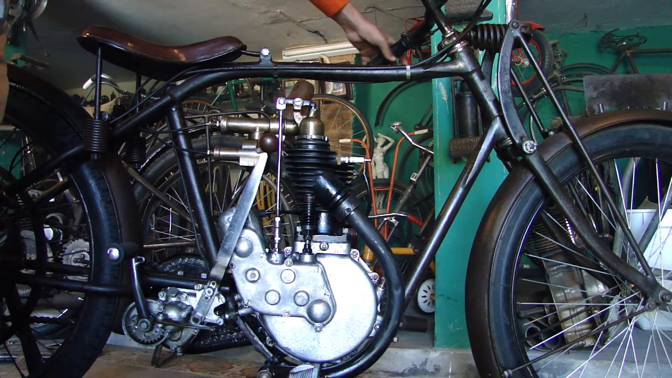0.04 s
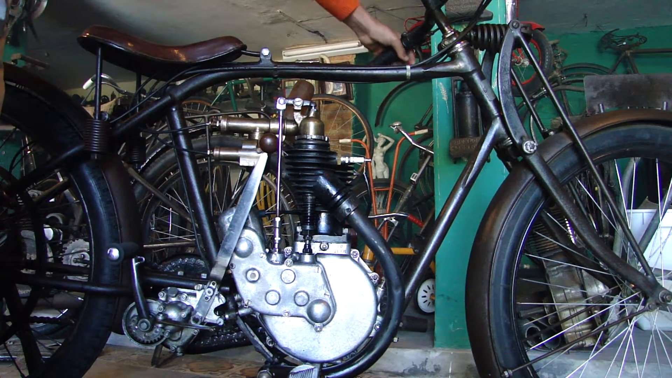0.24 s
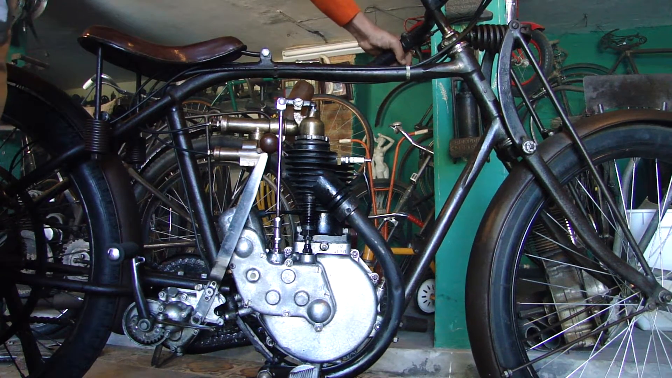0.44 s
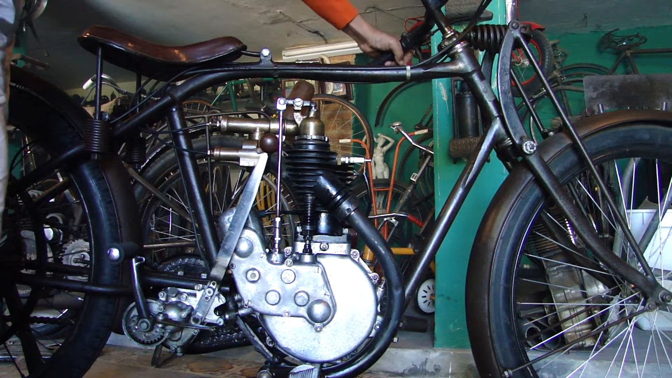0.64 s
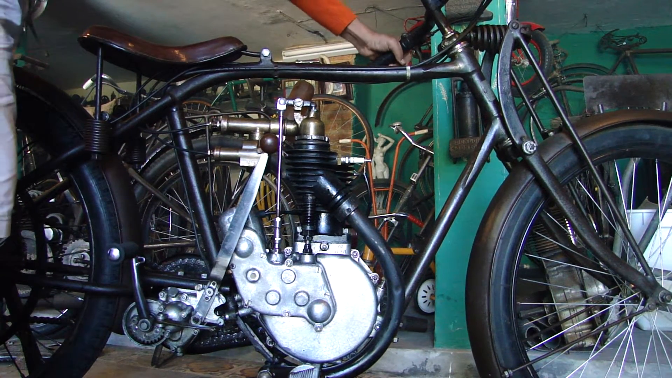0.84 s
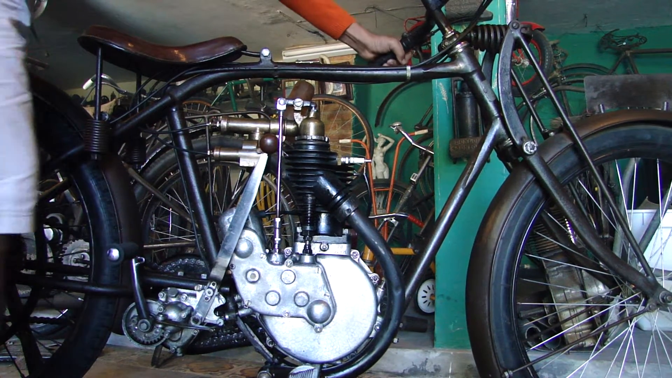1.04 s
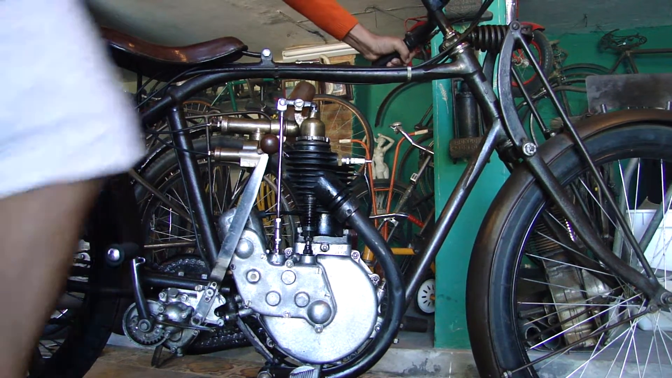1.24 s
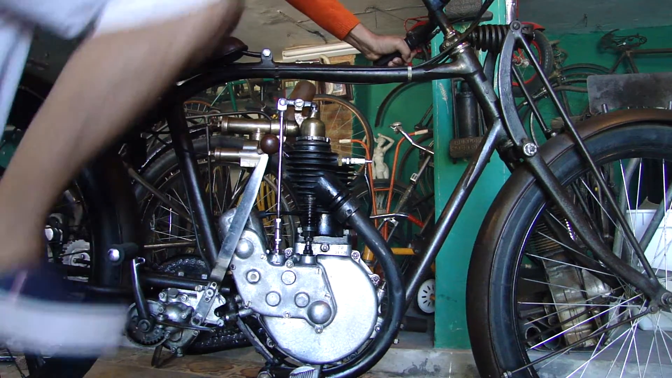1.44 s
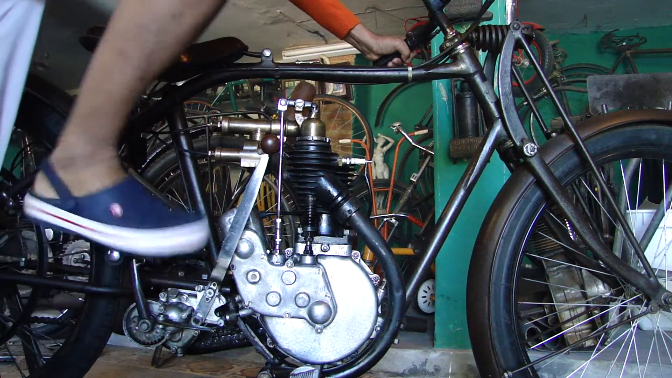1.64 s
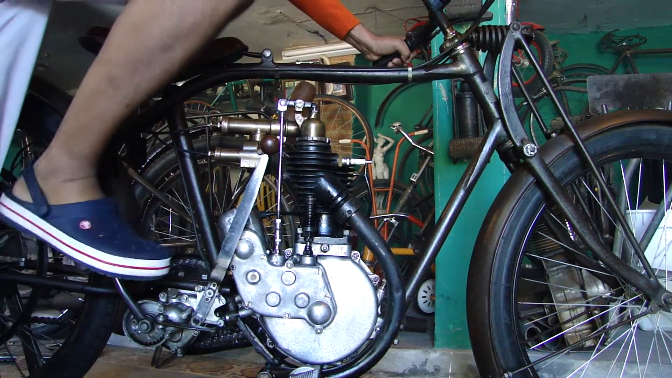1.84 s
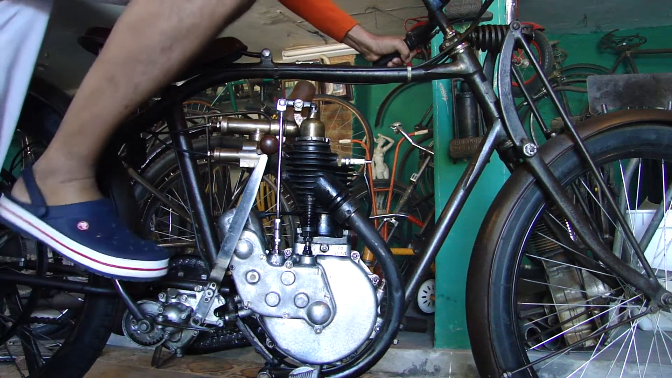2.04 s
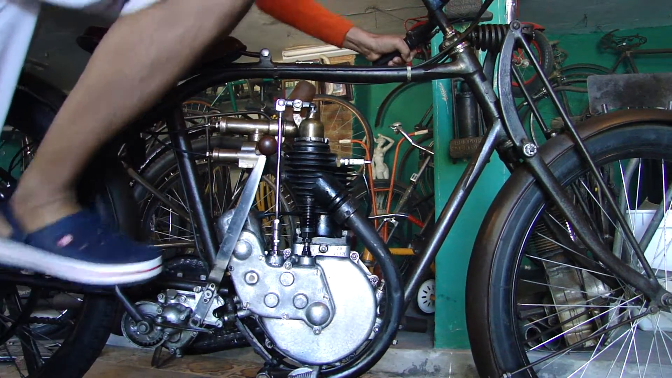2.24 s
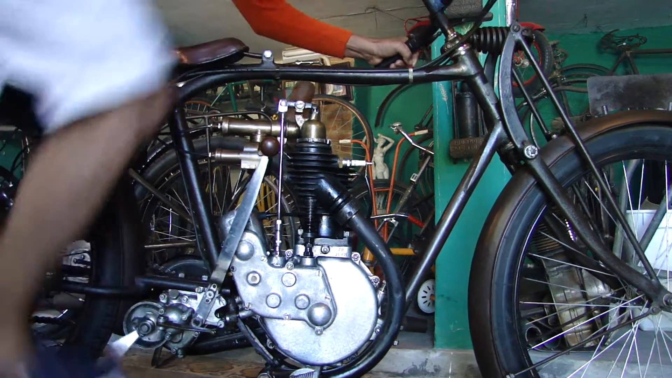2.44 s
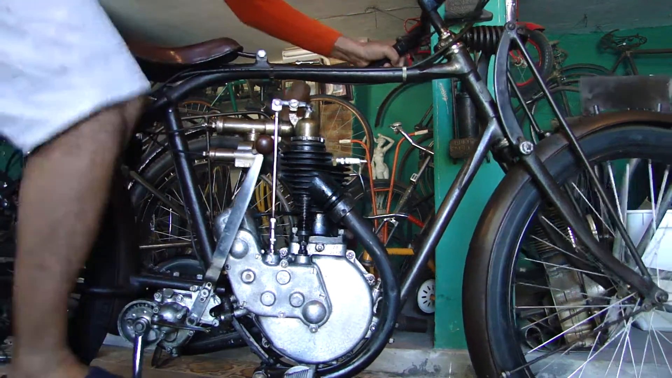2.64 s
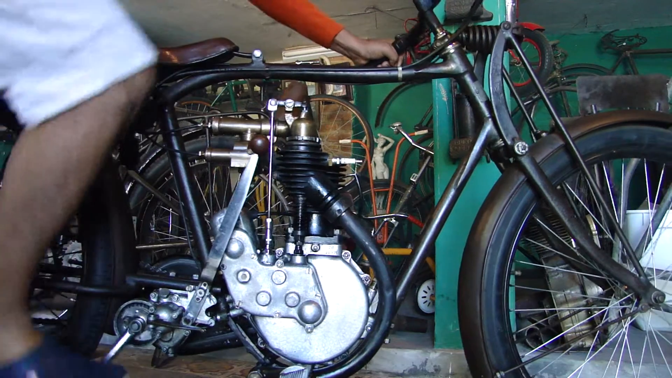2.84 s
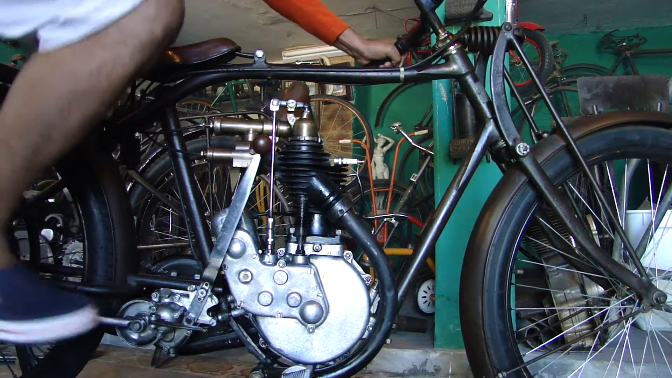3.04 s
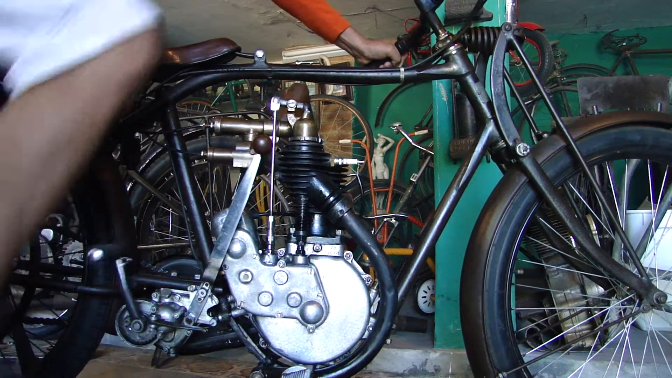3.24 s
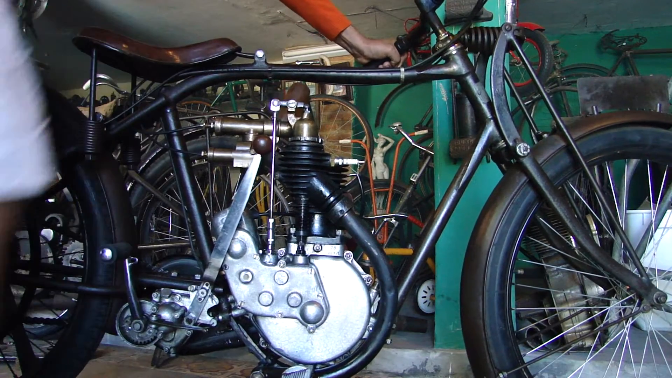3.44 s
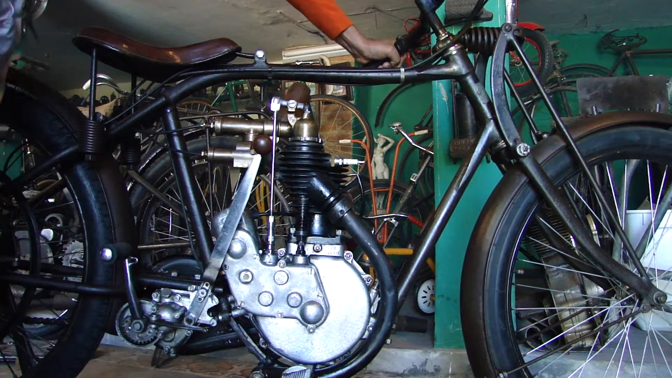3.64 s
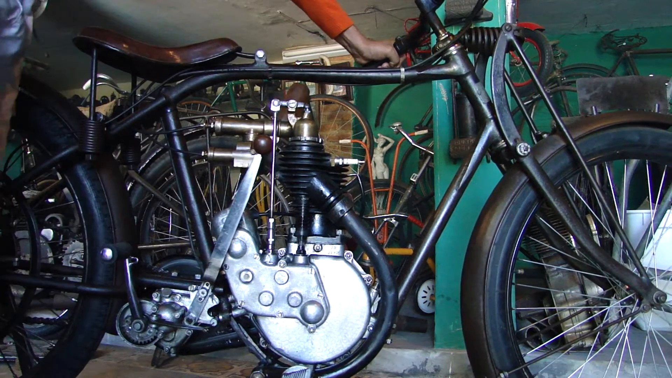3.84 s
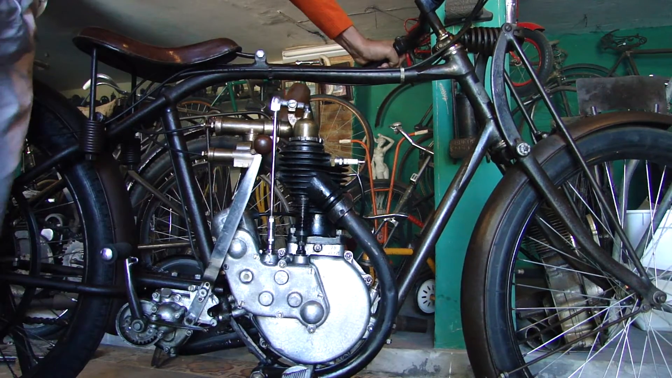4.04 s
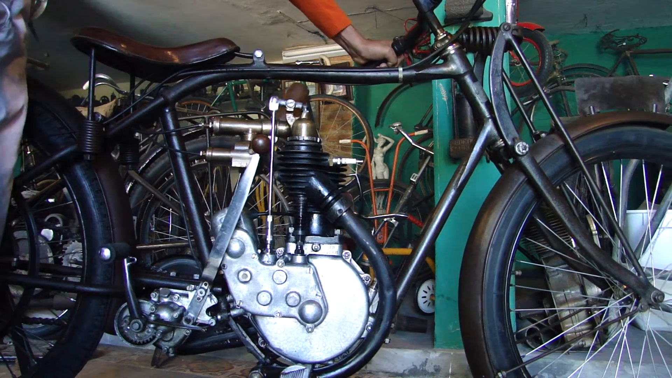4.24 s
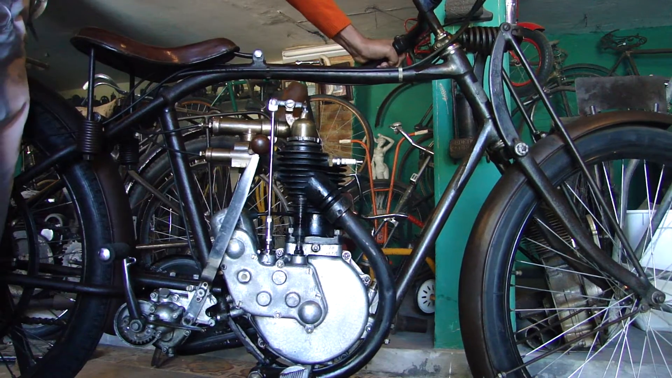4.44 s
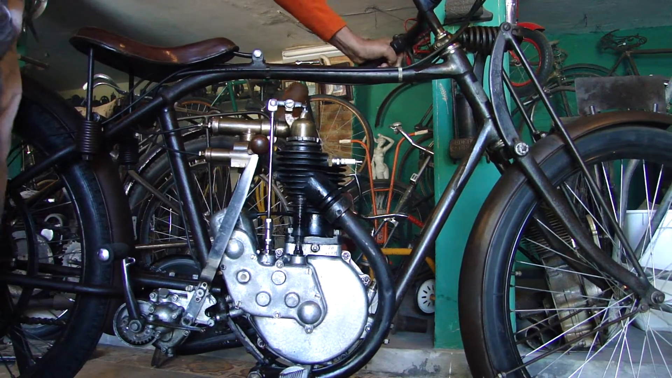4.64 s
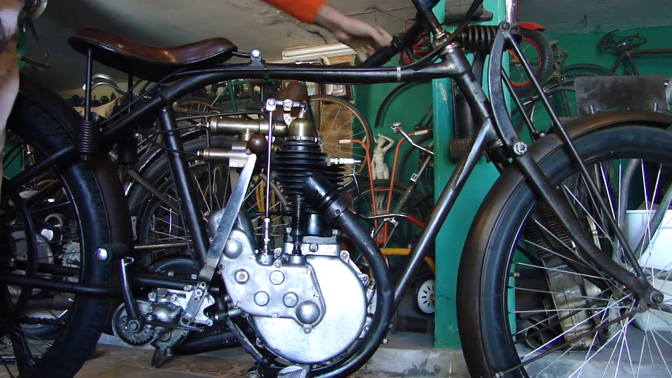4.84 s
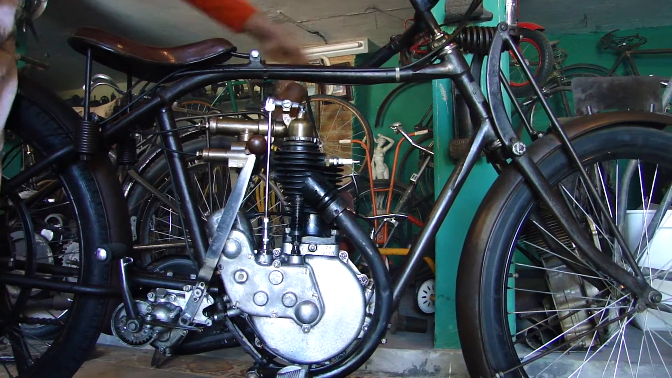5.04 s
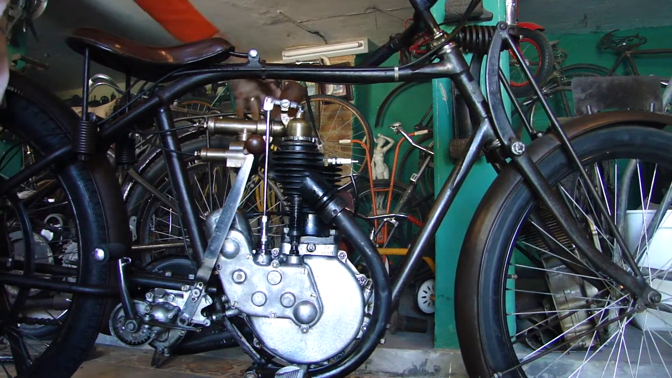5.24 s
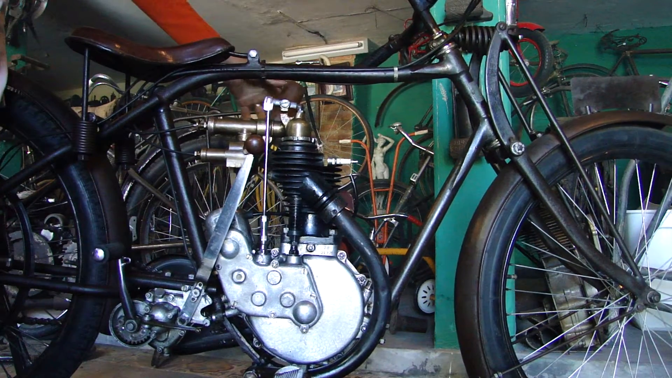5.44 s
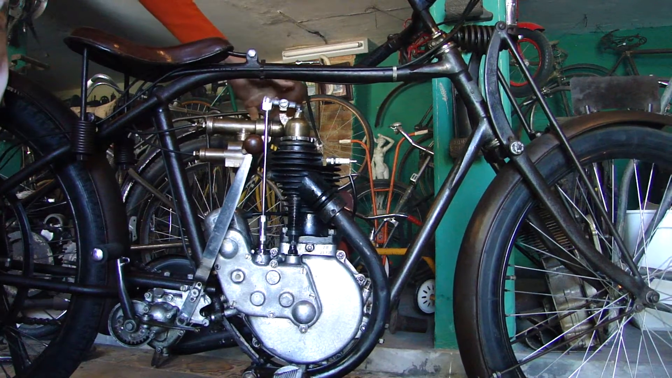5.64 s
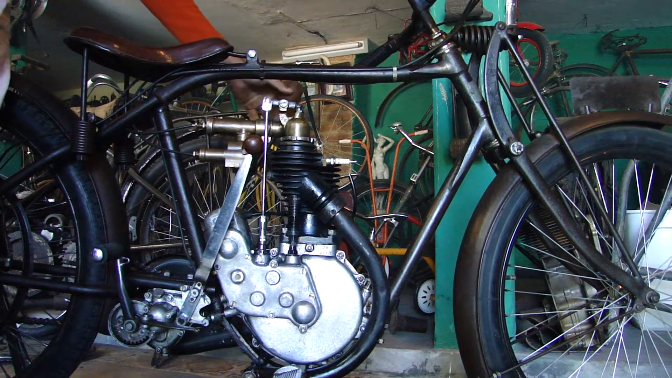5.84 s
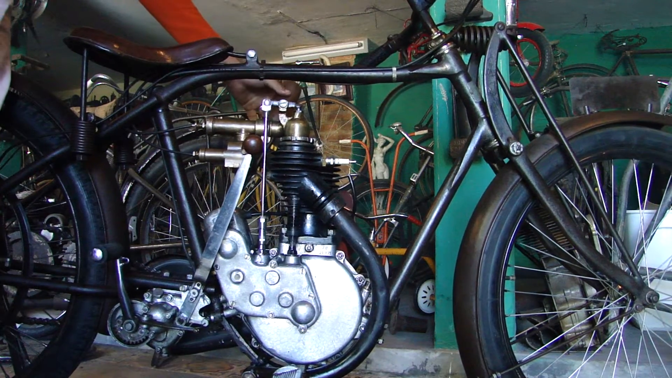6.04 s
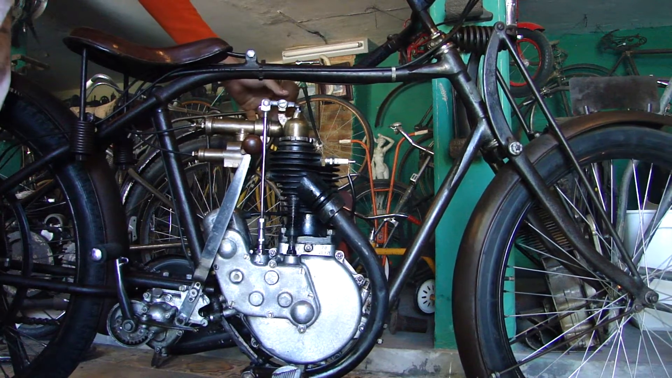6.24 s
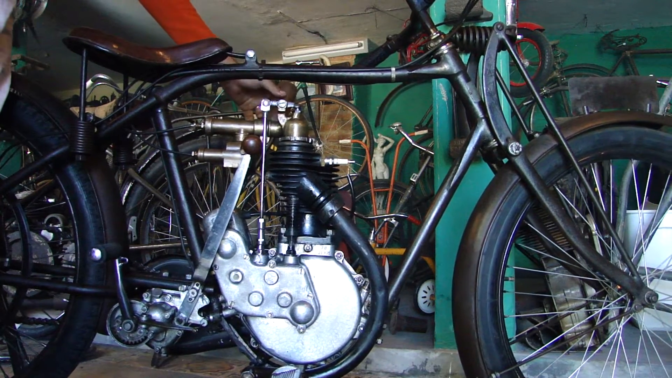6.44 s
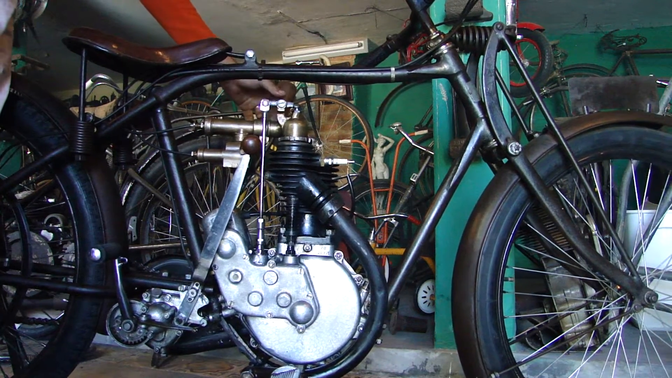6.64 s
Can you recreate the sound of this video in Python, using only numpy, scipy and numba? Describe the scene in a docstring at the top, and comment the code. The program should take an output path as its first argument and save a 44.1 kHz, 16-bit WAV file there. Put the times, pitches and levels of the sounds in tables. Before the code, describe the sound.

Quiet metallic clicks and a foot on a pedal, then a rapid ratchet run and a harsh engine start settling into clattering, skipping exhaust pops.

```python
"""In a small workshop with a faint drone and swishing clothes, a lever clicks; its struck metal rings on.
A foot lands on the kick-start pedal, gears squeak, and the ratchet clicks singly, then in a quick run.
The old single-cylinder motorcycle catches harshly and settles to an idle, often skipping cycles.
Random ticks shaken by the turning engine make the clatter; each firing is a pressure pulse, a crack and a hiss.
The bangs ring the room, and the whole level dips briefly after each one."""
import sys
import numpy as np
from scipy import signal
from scipy.fft import rfft, irfft, next_fast_len
from scipy.io import wavfile
from scipy.ndimage import uniform_filter1d
from numba import njit

SR = 44100
rng = np.random.default_rng(int(sys.argv[2]) if len(sys.argv) > 2 else 0)


def materialize(psi):
    """Save the field psi as 16-bit PCM at rate SR to the path in sys.argv[1].

    A 1-D psi becomes a single channel; in a 2-D psi each row is a channel.
    """
    bounded = np.clip(np.atleast_2d(psi).T, -1, 1)
    quanta = np.round(bounded * 32767).astype(np.int16)
    wavfile.write(sys.argv[1], SR, quanta)


N = 295470
TIME = np.arange(N) / SR
TAIL = TIME[:SR * 3 // 4]  # time axis of short sounds and echoes, in seconds
TOP_HZ = 13000

# All levels are relative: the functions, the room and the final level control shift them further.
# swells of a faint, wavering drone: [middle t/s, half length/s, level/dB]
DRONE_SWELLS = [(.02, 0.1, -58), (.82, 0.44, -53.5), (1.44, 0.077, -52.5)]
# tone of the quiet air: [f/Hz, level/dB]
AIR_SPECTRUM = [(20, -50), (69, -30), (200, -20), (390, -17), (900, -20), (10300, -33), (13000, -46)]

# ringing modes of the workshop: [f/Hz, level/dB, t60/s]
ROOM_MODES = [(95.8, 12.5, 0.62), (117.7, 9, 0.39), (140.8, 10, 0.28), (194, 12, .19), (214.3, 8.5, 0.15),
              (316, 1, 0.26), (480.4, 5, 0.75), (498.6, 4, 0.4), (540, 8, 0.24), (622.6, 5.5, 0.68),
              (773.5, 7.5, 0.16)]
# tone of the room's scattered echoes: [f/Hz, level/dB]
DIFFUSE_SPECTRUM = [(60, -15.5), (200, -7.5), (600, -3), (1000, -1), (13000, -1.5)]
# time in which the scattered echoes fall by 60 dB: [f/Hz, t60/s]
ROOM_T60 = [(150, 0.76), (400, 0.53), (1000, 0.25), (3000, 0.33), (10000, 0.22)]
# walls and floor throw the low notes back: [delay/s, level/dB, favoured f/Hz]
WALL_ECHOES = [(.016, -2.5, 192), (.0285, -3.5, 545), (.0365, -6, 592), (.044, -5.5, 294)]
# how much louder the left side is: [f/Hz, left minus right level/dB]
LEFT_LEAD = [(100, 7.5), (250, 9.5), (500, 6), (1000, 7), (2000, 4), (8000, 1.5)]
# how far the left side leads in phase: [f/Hz, phase/rad]
LEFT_PHASE = [(3500, 0), (6500, 5)]

# swishes of clothing as the leg lifts: [middle t/s, half length/s, level/dB]
CLOTH_SWISHES = [(.13, 0.052, -51.5), (1.19, 0.11, -52.5), (1.49, 0.19, -47)]
# tone of the cloth: [f/Hz, level/dB]
CLOTH_SPECTRUM = [(88, -59), (150, -14), (520, -5.5), (2610, -9.5), (10800, -17), (13000, -21)]
# blows on the control lever: [t/s, level/dB, contact time/s]
LEVER_HITS = [(.4675, -15, 0.0038), (.4703, -5.5, 0.0022)]
# ringing modes of the lever: [f/Hz, level/dB, t60/s]
LEVER_MODES = [(727, 11, 0.16), (1327, 4.6, 0.092), (1750, 11, 0.15), (2120, 5.6, 0.22), (2525, 5, 0.16),
               (3170, 8, 0.25), (3910, 5, 0.2)]
# tone of the lever: [f/Hz, level/dB]
LEVER_SPECTRUM = [(100, -40), (500, -16), (1200, 0), (2300, -2), (3120, 4), (4200, -1.5), (6120, -15.5),
                  (11000, -16), (12500, -58)]
# the foot lands on the pedal: [t/s, level/dB, contact time/s]
PEDAL_HITS = [(1.775, -7, 0.0016)]
# ringing modes of the pedal: [f/Hz, level/dB, t60/s]
PEDAL_MODES = [(543, 4.5, 0.17), (860, 6, 0.22), (1104, 1, 0.48), (1460, 0, 0.22), (3740, 17, 0.038)]
# tone of the pedal: [f/Hz, level/dB]
PEDAL_SPECTRUM = [(60, -46), (125, -16), (260, -14.5), (550, -5.5), (900, 1), (1500, -4), (2200, -4.5),
                  (3700, -15), (4600, -16.5), (13000, -26)]
# dull knocks in the frame, from the lever's stop and the loaded pedal: [t/s, level/dB, contact time/s]
FRAME_KNOCKS = [(.481, -22.5, 0.011), (1.683, -25.5, 0.026), (2.165, -30, 0.016), (2.226, -24, 0.014)]
# tone of those knocks: [f/Hz, level/dB]
FRAME_SPECTRUM = [(200, -23), (340, -2), (700, 2.5), (1200, -4), (2200, -10.5), (4500, -26)]
# ratchet teeth that click singly as the pedal takes up the slack: [t/s, level/dB]
SINGLE_TEETH = [(1.9905, -20.5), (2.274, -27), (2.2936, -15.5), (2.3255, -20), (2.37, -18)]
# ringing modes of the ratchet: [f/Hz, level/dB, t60/s]
RATCHET_MODES = [(541, 8, .4), (1430, 13.5, 0.31), (2113, 9, 0.15)]
# tone of the ratchet's teeth: [f/Hz, level/dB]
TEETH_SPECTRUM = [(150, -23), (500, 0), (850, -1), (1300, 3.5), (2800, 0.5), (4500, 3), (6000, -7),
                  (11000, -13), (13000, -29)]
# the kick-start gears grab and squeak: [t/s, level/dB, f/Hz]
GEAR_GRABS = [(1.683, -46, 2180), (2.345, -26, 1350), (2.375, -23, 1180), (2.393, -21, 1240),
              (2.403, -17.5, 4100), (2.414, -18, 4500), (2.475, -22, 1410), (2.52, -19, 2040)]

# ringing modes of the engine's metal: [f/Hz, level/dB, t60/s]
ENGINE_MODES = [(865, 2.5, 0.02), (1615, 2, 0.058), (2086, 3.5, 0.034), (2355, -0.5, 0.13),
                (3760, -10, 0.2)]
# tone of the clatter: [f/Hz, level/dB]
CLATTER_SPECTRUM = [(60, -26), (150, 7), (500, -20.5), (800, -4.5), (1400, 0), (2600, -2), (3900, -1),
                    (5000, -5), (7000, -8), (10500, -11), (11800, -13.5), (13000, -52)]
# tone of the gear whirr: [f/Hz, level/dB]
WHIRR_SPECTRUM = [(100, -50.5), (330, -6.5), (550, -2.5), (800, -11), (1220, -3.5), (1600, -11),
                  (2500, -16), (6000, -43.5)]
# tone of the valve's clack: [f/Hz, level/dB]
VALVE_SPECTRUM = [(700, -42), (2000, 5), (3400, 3), (4600, 2), (6500, -16), (11000, -19), (13000, -33)]
# steel fittings struck hard enough to ring on alone: [t/s, level/dB, f/Hz]
CHINKS = [(2.772, -8.5, 2130), (3.4556, -29, 2020), (3.6214, -28, 3460), (3.846, -23, 2110),
          (4.5112, -26, 3170), (5.074, -29, 3180), (5.2115, -26, 3400), (5.3455, -17, 1970),
          (6.3854, -28, 3170), (6.5906, -28, 3160)]

# firings, with the pipe resonance that each crack favours: [t/s, level/dB, f/Hz]
FIRINGS = [(2.5449, -3.5, 3400), (2.6754, -5.5, 3360), (2.76, 0.5, 5140), (2.855, -0.5, 5070),
           (3.0324, -7, 5300), (3.287, -7.5, 3700), (3.5338, -5, 3480), (3.69, -4.5, 3350),
           (3.844, -7, 3460), (3.992, -3.5, 1160), (4.14, -7, 5570), (4.3564, -8.5, 5900),
           (4.571, -6, 3400), (4.7101, -2, 1550), (4.9241, -6.5, 3350), (5.1352, -9, 1110),
           (5.346, -8, 2015), (5.483, -7, 1360), (5.618, -8.5, 1680), (5.8244, -5, 5530), (5.961, -3, 1080),
           (6.1001, -4.5, 1143), (6.2364, -9.5, 3340), (6.4429, -9.5, 3480), (6.65, -5, 2940)]
# tone of the crack and hiss: [f/Hz, level/dB]
CRACK_SPECTRUM = [(100, -20), (400, -9), (750, -4.5), (1150, -3), (1600, -5), (2500, -6), (3450, -2),
                  (4500, -3.5), (5600, -6.5), (7200, -10.5), (10500, -9), (12000, -10), (13500, -46)]
# hollow ring of the exhaust pipe: [f/Hz, level/dB, t60/s]
PIPE_MODES = [(1053, 1.5, 0.039), (1293, 6, 0.048), (1540, -1.5, 0.022)]
# tone of the burnt gas leaving the pipe: [f/Hz, level/dB]
CHUFF_SPECTRUM = [(90, -16), (190, -1.5), (290, 1.5), (550, 0), (1500, 0.5), (4000, -8.5), (6500, -28),
                  (11000, -2.5), (13000, -43)]
# resonances of the gas that whistles out on the first firings: [f/Hz, level/dB, t60/s]
LEAK_MODES = [(7900, 17, 0.0054), (9800, 17, 0.0041)]

# the foot's low thump: level against the pedal blow, and pitch
THUD_DB, THUD_HZ = -31, 170
# the kick: the gears start to turn, the ratchet bites, the engine catches
KICK_S, BITE_S, CATCH_S = 2.14, 2.396, 2.562
# the run of teeth after the bite
TEETH_PER_S, BITE_DB, TEETH_FADE_DB_PER_S = 56, -7, 29
# how fast clatter and whirr swell under the kick
CLATTER_RISE_DB_PER_S, WHIRR_RISE_DB_PER_S = 135, 74

# a working cycle shortens from its length at catching towards its length at idle
CATCH_CYCLE_S, IDLE_CYCLE_S, SETTLE_S = .095, .069, .9
# the harsh flare on catching holds, then dies away
FLARE_HOLD_S, FLARE_FADE_S = 0.28, 0.15
# idle levels, and what the flare adds
CLATTER_DB, TREBLE_DB, WHIRR_DB = -22, 5.5, -28.5
FLARE_CLATTER_DB, FLARE_TREBLE_DB, FLARE_WHIRR_DB, FLARE_CRACK_DB = 10.5, 3, 8, 4
# the clatter's lull at a missed firing: depth, half length, and how far ahead of it
LULL_DB, LULL_HALF_S, LULL_LEAD_S = -4, .024, .014
# a gulp of air: level, pitch, delay after the firing, half length
GULP_DB, GULP_HZ, GULP_LAG_S, GULP_HALF_S = -15.5, 194, .054, .022

# the exhaust's body starts thinner and is full at time WARM_S
COLD_CHUFF_DB, WARM_S = -3, 3.6
# spurts of escaping gas: their spread and rate
SPUTTER_DB, SPURTS_PER_S = 4, 220
# crack of gas: level over the firing's strength, and decay
CRACK_DB, CRACK_S = 11.5, .0024
# the favoured resonance of a crack: level and sharpness
BARK_DB, BARK_Q = 0, 5
# level of a bang's direct path, and build-up time of its scattered echoes
BANG_DIRECT_DB, BANG_GAP_S = -7, .004


def undb(db):
    """Decibels to gain."""
    return 10 ** (np.asarray(db) / 20)


def unit(x):
    """Scale to an average strength (rms) of 1."""
    return x / np.sqrt(np.mean(x ** 2))


def on_log_axis(hz, points):
    """Read (Hz, value) points on a log-frequency axis."""
    f, value = np.transpose(points)
    return np.interp(np.log(hz + 1), np.log(f), value)


def through(x, response):
    """Pass a sound through an impulse response, the answer to a single click."""
    return signal.fftconvolve(np.atleast_2d(x), np.atleast_2d(response), axes=-1)[:, :x.shape[-1]]


def shape(points, size=2048):
    """Impulse response with the given (Hz, dB) spectrum and nothing ahead of the click."""
    gain = undb(on_log_axis(np.fft.rfftfreq(size, 1 / SR), points))
    # folding the cepstrum (spectrum of the log spectrum) forward packs the energy early
    cepstrum = irfft(np.log(gain))
    cepstrum[1:size // 2] *= 2
    cepstrum[size // 2 + 1:] = 0
    return irfft(np.exp(rfft(cepstrum)))


def colour(x, points):
    """Give a white sound a spectrum and keep its power."""
    response = shape(points)
    return through(x, response / np.linalg.norm(response))


def ringing(modes, polarity=1):
    """Impulse response of fading tones (modes), each with its dB as the gain at its peak."""
    out = 0
    for k, (hz, db, t60) in enumerate(modes):
        rate = np.log(1000) / t60
        tone = np.exp(-rate * TAIL) * np.cos(2 * np.pi * hz * TAIL)
        out = out + polarity ** k * undb(db) * 2 * rate / SR * tone
    return out


def body(force, spectrum, modes):
    """A struck metal part: a broad clack with modes ringing on."""
    return colour(force + through(force, ringing(modes)), spectrum)


def add(track, s, sound):
    """Mix a sound into a track at time s."""
    start = int(s * SR)
    track[start:start + len(sound)] += sound[:max(N - start, 0)]


def burst(decay_s, size=4096, evenness=0.21):
    """A rough contact or jet of gas: fading noise with the energy of one millisecond at full level."""
    age = TAIL[:size] / decay_s
    x = rng.standard_normal(size) * (np.exp(-age) - np.exp(-4 * age))
    # partly even out the spectrum, then cut off the late part
    for _ in range(2):
        spectrum = rfft(x)
        evened = irfft(spectrum / (np.abs(spectrum) + 1e-12) ** min(evenness, 1))
        x = evened * np.exp(-(age / 3) ** 4)
    return x * np.sqrt(SR / 1000) / np.linalg.norm(x)


def blows(hits):
    """Force of (s, dB, contact time) blows, each a rough burst."""
    force = np.zeros(N)
    for s, db, contact_s in hits:
        add(force, s, undb(db) * burst(contact_s))
    return force


def swells(table):
    """Gain over time of smooth (middle s, half length s, dB) swells."""
    return sum(undb(db) * np.exp(-((TIME - s) / half_s) ** 2) for s, half_s, db in table)


def walk(rate):
    """Smooth random wandering with a spread near 1."""
    hold = int(SR / rate)
    steps = np.repeat(rng.standard_normal(N // hold + 1), hold)
    smooth = uniform_filter1d(uniform_filter1d(steps, hold), hold)
    return unit(smooth[:N])


def background(air_db=-56, drone_hz=600, rush_hz=680, rush_q=1.03):
    """Quiet workshop air as shaped noise, and a faint drone that wavers and breaks up in a hollow rush."""
    # the noise shared by both sides makes them partly alike
    hiss = unit(rng.standard_normal((2, N)) + 0.5 * rng.standard_normal(N))
    air = colour(hiss, AIR_SPECTRUM)
    b, a = signal.iirpeak(rush_hz, rush_q, fs=SR)
    rush = unit(signal.lfilter(b, a, signal.lfilter(b, a, rng.standard_normal(N))))
    wavering_hz = drone_hz * (1 + .04 * walk(40))
    note = np.sin(2 * np.pi * np.cumsum(wavering_hz) / SR) * np.clip(walk(25) + .3, 0, 1.5)
    return undb(air_db) * air + unit(rush + unit(note)) * swells(DRONE_SWELLS)


def workshop(x, direct_db, diffuse_db, modes_db, first_s=0.0017, build_s=0.0042):
    """Direct sound, scattered echoes that differ on each side, and standing waves that both sides share."""
    hz = np.fft.rfftfreq(len(TAIL), 1 / SR)
    noise, tail = rfft(rng.standard_normal((2, len(TAIL)))), 0
    # each band of the echoes fades at its own speed
    for band, (_, t60) in zip(np.eye(len(ROOM_T60)), ROOM_T60):
        weight = on_log_axis(hz, np.c_[np.array(ROOM_T60)[:, 0], band])
        tail = tail + irfft(noise * weight, len(TAIL)) * undb(-60 * TAIL / t60)
    tail = tail * (1 - np.exp(-(TAIL / first_s) ** 2))
    tail = through(tail / np.linalg.norm(tail, axis=1, keepdims=True), shape(DIFFUSE_SPECTRUM))
    standing = -ringing(ROOM_MODES, polarity=-0.98) * (1 - np.exp(-(TAIL / build_s) ** 2))
    return undb(direct_db) * x + through(x, undb(diffuse_db) * tail + undb(modes_db) * standing)


def wall_echoes(x, q=4.14):
    """Each nearby surface returns one band of low notes after a short delay."""
    response = np.zeros(len(TAIL))
    for s, db, hz in WALL_ECHOES:
        b, a = signal.iirpeak(hz, q, fs=SR)
        click = signal.unit_impulse(len(TAIL), int(s * SR))
        response += undb(db) * signal.lfilter(b, a, click)
    return through(x, response)


def far_wall(x, wall_db=-11, delay_s=0.033, spread_s=0.022):
    """The cluttered far wall throws each crack back as a short spray."""
    response = np.zeros((2, N))
    for side in response:
        add(side, delay_s, burst(spread_s))
    return undb(wall_db) * through(x, response[:, :len(TAIL)] / np.linalg.norm(response[0]))


def two_sides(x):
    """The left side is louder, above all in the bass; in the treble the right side lags in phase."""
    sides = np.array([shape([(hz, sign * db / 2) for hz, db in LEFT_LEAD]) for sign in (1, -1)])
    left, right = through(x, sides)
    size = next_fast_len(N)
    lag_rad = on_log_axis(np.fft.rfftfreq(size, 1 / SR), LEFT_PHASE)
    return np.array([left, irfft(rfft(right, size) * np.exp(-1j * lag_rad), size)[:N]])


def ratchet_teeth(contact_s=0.00092, scatter_db=2, jitter_s=0.0021):
    """Blows of the ratchet: single clicks, then a quick, slightly uneven run from the bite to the catch."""
    run_s = np.arange(BITE_S, CATCH_S, 1 / TEETH_PER_S)
    run = []
    for s, (late, hard) in zip(run_s, rng.standard_normal((len(run_s), 2))):
        db = BITE_DB - TEETH_FADE_DB_PER_S * (s - BITE_S) + scatter_db * hard
        run.append((s + jitter_s * late, db))
    return [(s, db, contact_s) for s, db in list(SINGLE_TEETH) + run]


def rider(lever_db=-3.0, pedal_db=-3.3):
    """Noise makes clothes swish; blows on lever, pedal, ratchet and frame set the metal sounding."""
    cloth = colour(rng.standard_normal(N), CLOTH_SPECTRUM) * swells(CLOTH_SWISHES)
    lever = body(blows(LEVER_HITS), LEVER_SPECTRUM, LEVER_MODES)
    pedal = body(blows(PEDAL_HITS), PEDAL_SPECTRUM, PEDAL_MODES)
    ratchet = body(blows(ratchet_teeth()), TEETH_SPECTRUM, RATCHET_MODES)
    frame = colour(blows(FRAME_KNOCKS), FRAME_SPECTRUM)
    return undb(lever_db) * lever + undb(pedal_db) * pedal + ratchet + frame + cloth


def thud(decay_s=0.0046):
    """The weight of the foot gives each blow on the pedal a soft, low thump."""
    out = np.zeros(N)
    swell = TAIL / decay_s * np.exp(1 - TAIL / decay_s)
    for s, db, _ in PEDAL_HITS:
        add(out, s, undb(db + THUD_DB) * np.sin(2 * np.pi * THUD_HZ * TAIL) * swell)
    return out


def starter_gears(half_s=0.0075, scatter_hz=110, grip_s=.0007):
    """Each grab of steel on steel is a short squeak, its pitch roughened by random slipping."""
    out = np.zeros(N)
    slip_hz = scatter_hz * unit(uniform_filter1d(rng.standard_normal(N), max(int(grip_s * SR), 1)))
    for s, db, hz in GEAR_GRABS:
        squeak = np.sin(2 * np.pi * np.cumsum(hz + slip_hz) / SR)
        out += undb(db) * np.exp(-((TIME - s) / half_s) ** 2) * squeak
    return out


def cycle_count():
    """Working cycles done so far, and the times at which the exhaust valve opens on an unburnt charge."""
    s = np.array(FIRINGS)[:, 0]
    cycle_s = IDLE_CYCLE_S + (CATCH_CYCLE_S - IDLE_CYCLE_S) * np.exp(-(s[:-1] - s[0]) / SETTLE_S)
    # a whole number of cycles fits between two firings
    steps = np.maximum(np.rint(np.diff(s) / cycle_s), 1)
    fired = np.r_[0, np.cumsum(steps)]
    # three cycles lead up to the first firing, two follow the last
    knots_s = np.r_[s[0] - .6, s, s[-1] + 2 * IDLE_CYCLE_S]
    knots = np.r_[-3, fired, fired[-1] + 2]
    missed = np.setdiff1d(np.arange(fired[-1]), fired)
    return np.interp(TIME, knots_s, knots), np.interp(missed, knots, knots_s)


def flare(s):
    """Harshness of the start: 1 until just after the engine catches, then fading to 0."""
    return np.exp(-np.maximum(s - CATCH_S - FLARE_HOLD_S, 0) / FLARE_FADE_S)


def turning():
    """Levels in dB of clatter, its treble boost and whirr: a swell under the kick, a flare, then idle."""
    early_s, harsh = np.maximum(CATCH_S - TIME, 0), flare(TIME)
    clatter_db = CLATTER_DB + FLARE_CLATTER_DB * harsh - CLATTER_RISE_DB_PER_S * early_s
    whirr_db = WHIRR_DB + FLARE_WHIRR_DB * harsh - WHIRR_RISE_DB_PER_S * early_s
    return clatter_db, TREBLE_DB + FLARE_TREBLE_DB * harsh, whirr_db


def strokes(cycle, scatter_db=4.5):
    """Each turn of the crank, half a working cycle, shakes a part with a random strength."""
    turn = np.floor(2 * (cycle - cycle[0])).astype(int)
    return undb(scatter_db * np.clip(rng.standard_normal(turn[-1] + 1), -2, 1))[turn]


def coasting(missed_s):
    """Gain of the clatter: it slackens around each cycle that fails to fire."""
    lull = sum(np.exp(-((TIME - s + LULL_LEAD_S) / LULL_HALF_S) ** 2) * (1 - flare(s)) for s in missed_s)
    return undb(LULL_DB * lull)


def tappets(cycle, ping_db=-25, scatter_db=3, phase=0.32, centre_hz=2600, spread=0.47):
    """Rockers and loose fittings ping four times a working cycle, each time at a random pitch."""
    times = TIME[1:][np.diff(np.floor(2 * 2 * (cycle - phase))) > 0]
    times = times[times > BITE_S]
    decay_s = .0016
    age = TAIL[:SR // 10]
    out = np.zeros(N)
    for s, (late, hard, pitch) in zip(times, rng.standard_normal((len(times), 3))):
        hz = centre_hz * np.exp(spread * np.clip(pitch, -2, 2))
        ping = np.sin(2 * np.pi * hz * age) * np.exp(-age / decay_s)
        add(out, s + 0.0043 * late, undb(ping_db + scatter_db * min(hard, 1.5)) * ping)
    return out


def mechanism(cycle, grains_per_s=600, scatter_db=3, valve_db=2, valve_phase=0.18, crank_db=2, crank_phase=0.41):
    """Gears and chain tick densely into the metal, hardest where the valves and piston turn round."""
    clatter_db, treble_db, whirr_db = turning()
    strength = undb(scatter_db * np.minimum(rng.standard_normal(N), 2))
    ticks = (rng.random(N) < grains_per_s / SR) * rng.choice([-1, 1], N) * strength
    valve_load_db = valve_db * np.cos(2 * np.pi * (cycle - valve_phase))
    crank_load_db = crank_db * np.cos(2 * 2 * np.pi * (cycle - crank_phase))
    load = undb(valve_load_db + crank_load_db)
    rattle = unit(ticks) + 0.16 * rng.standard_normal(N)
    force = unit(load * strokes(cycle) * rattle) * undb(clatter_db - 5.0)
    clatter = body(force + tappets(cycle), CLATTER_SPECTRUM, ENGINE_MODES)
    treble = signal.sosfilt(signal.butter(1, 4000, "high", fs=SR, output="sos"), clatter)
    whirr = colour(unit(load * rng.standard_normal(N)), WHIRR_SPECTRUM) * undb(whirr_db) * (TIME > KICK_S)
    return clatter + (undb(treble_db) - 1) * treble + whirr


def valve(cycle, clack_db=-16, scatter_db=4, phase=.14, contact_s=0.0027):
    """The valve drops on its seat once a working cycle, with a random force."""
    times = TIME[1:][np.diff(np.floor(cycle - phase)) > 0]
    times = times[times > CATCH_S]
    strengths = clack_db + scatter_db * np.minimum(rng.standard_normal(len(times)), 1.5)
    return colour(blows([(s, db, contact_s) for s, db in zip(times, strengths)]), VALVE_SPECTRUM)


def fittings(pair_db=-6, tick_db=5):
    """A struck fitting ticks and rings briefly with a close pair of modes."""
    out = np.zeros(N)
    t60, pair_ratio = .09, 1.04
    for s, db, hz in CHINKS:
        turn = 2 * np.pi * hz * TAIL
        pair = np.sin(turn) + undb(pair_db) * np.sin(pair_ratio * turn)
        add(out, s, undb(db - 60 * TAIL / t60) * pair)
        add(out, s, undb(db + tick_db) * colour(burst(0.0025), CLATTER_SPECTRUM)[0])
    return out


def engine_metal(cycle, missed_s, count=3):
    """Clatter comes from several places on the machine, and each reaches the walls by its own paths."""
    drive = coasting(missed_s)
    places = [drive * mechanism(cycle) / np.sqrt(count) for _ in range(count)]
    places.append(valve(cycle))
    clatter = sum(workshop(x, direct_db=-7, diffuse_db=1, modes_db=-0.5) for x in places)
    return clatter + workshop(fittings(), direct_db=7.0, diffuse_db=3, modes_db=-20)


def intake():
    """While it flares, the engine gulps air with one low throb after each firing."""
    out = np.zeros(N)
    gulp = np.sin(2 * np.pi * GULP_HZ * TAIL) * np.exp(-((TAIL - GULP_LAG_S) / GULP_HALF_S) ** 2)
    for s, _, _ in FIRINGS:
        add(out, s, undb(GULP_DB) * np.sqrt(flare(s)) * gulp)
    return out


def sputter():
    """Gas that escapes in ragged spurts: noise with a randomly wandering level."""
    return unit(rng.standard_normal(N) * undb(SPUTTER_DB * np.clip(walk(SPURTS_PER_S), -2, 1)))


def leak(leak_db=0, decay_s=0.011, seal_s=0.42):
    """A thin whistling hiss spits out at the firings, weaker each time as the engine seals."""
    flow = np.zeros(N)
    for s, _, _ in FIRINGS:
        add(flow, s, undb(leak_db) * np.exp(-(s - CATCH_S) / seal_s - TAIL / decay_s))
    return through(flow * sputter(), ringing(LEAK_MODES))


def warmth(s):
    """Gain of the exhaust's body: thin on catching, full once the engine has warmed."""
    return undb(COLD_CHUFF_DB * np.clip((WARM_S - s) / (WARM_S - CATCH_S), 0, 1))


def chuff(chuff_db=-9, stroke_s=0.059):
    """After each bang the rising piston pushes the burnt gas out of the pipe in ragged gusts."""
    flow = np.zeros(N)
    stroke = np.sqrt(np.abs(np.sin(np.pi * np.minimum(TAIL / stroke_s, 1))))
    for s, db, _ in FIRINGS:
        add(flow, s, undb(db + chuff_db) * warmth(s) * stroke)
    return colour(flow * sputter(), CHUFF_SPECTRUM)


def bark(x, hz):
    """Every crack of gas favours one resonance of the pipe, heard straight from its mouth."""
    b, a = signal.iirpeak(hz, BARK_Q, fs=SR)
    return undb(BARK_DB) * signal.lfilter(b, a, x)


def exhaust(missed_s, width_s=0.00052, pulse_db=4, crack_lag_s=0.0005, hiss_db=2, hiss_s=0.033, miss_db=-24):
    """Each firing is a pressure pulse followed by a crack of gas and a hiss; missed cycles only puff."""
    pulses, cracks, barks, hiss = np.zeros((4, N))
    lead_s = .004  # the pulse starts this early
    u = (TAIL - lead_s) / width_s + 1.12
    pulse = u * np.exp(-u ** 2 / 2)  # one swing of pressure
    pipe = ringing(PIPE_MODES)
    for s, db, hz in FIRINGS:
        crack = undb(db + CRACK_DB + FLARE_CRACK_DB * flare(s)) * burst(CRACK_S)
        add(pulses, s - lead_s, undb(db + pulse_db) * pulse)
        add(cracks, s + crack_lag_s, crack)
        add(barks, s + crack_lag_s, bark(crack, hz) + warmth(s) * through(crack, pipe)[0])
        add(hiss, s + crack_lag_s, undb(db + hiss_db) * burst(hiss_s))
    for s in missed_s:
        puff_db = miss_db + pulse_db + 2 * rng.standard_normal()
        add(pulses, s - lead_s, undb(puff_db) * pulse)
    return pulses + colour(hiss, CRACK_SPECTRUM), colour(cracks, CRACK_SPECTRUM), colour(barks, CRACK_SPECTRUM)


def scene():
    """Background, kick, engine and exhaust sound together in the workshop, spread over two sides."""
    cycle, missed_s = cycle_count()
    kick = workshop(rider() + thud(), direct_db=-7.5, diffuse_db=2.5, modes_db=-18)
    kick = kick + workshop(starter_gears(), direct_db=2, diffuse_db=0.5, modes_db=-20)
    engine = intake() + engine_metal(cycle, missed_s)
    pops, cracks, barks = exhaust(missed_s)
    gas = chuff() + leak()
    bangs = sum(workshop(x, direct_db=BANG_DIRECT_DB, diffuse_db=-4.0, modes_db=-3,
                         first_s=BANG_GAP_S, build_s=0.0063) for x in (pops, gas))
    snaps = workshop(cracks, direct_db=BANG_DIRECT_DB, diffuse_db=-2.0, modes_db=0, first_s=BANG_GAP_S)
    snaps = snaps + undb(BANG_DIRECT_DB) * barks + far_wall(cracks)
    echoes = wall_echoes(pops + cracks + gas)
    return two_sides(background() + kick + engine + bangs + snaps + echoes)


@njit
def follow(size, attack, release):
    """Level detector that rises fast and falls more slowly."""
    out, e = np.empty(len(size)), 0.
    for i in range(len(size)):
        e += (size[i] - e) * (attack if size[i] > e else release)
        out[i] = e
    return out


def record(dry, top_db=-8.5, attack_s=0.0023, release_s=0.063, low_cut_hz=80):
    """Loud sound turns the level down briefly; peaks are rounded, the deep bass and the top are cut."""
    level = follow(np.abs(dry).max(axis=0), 1 / (attack_s * SR), 1 / (release_s * SR))
    ducked = dry / np.maximum(level / undb(top_db), 1)
    ceiling = .9
    x = ceiling * np.tanh(ducked / ceiling)
    x = signal.sosfilt(signal.butter(2, low_cut_hz, "high", fs=SR, output="sos"), x)
    return signal.sosfilt(signal.ellip(8, .2, 70, TOP_HZ, fs=SR, output="sos"), x)


dry = scene()
out = record(dry)
materialize(out)
```